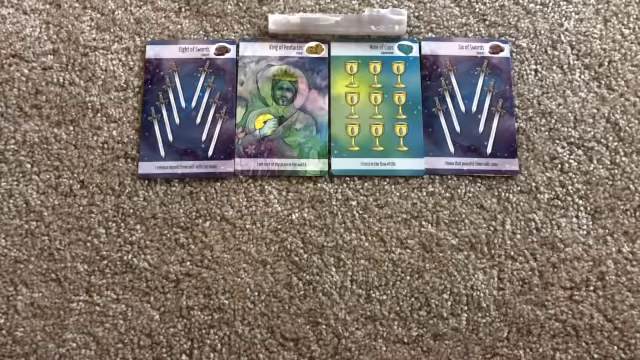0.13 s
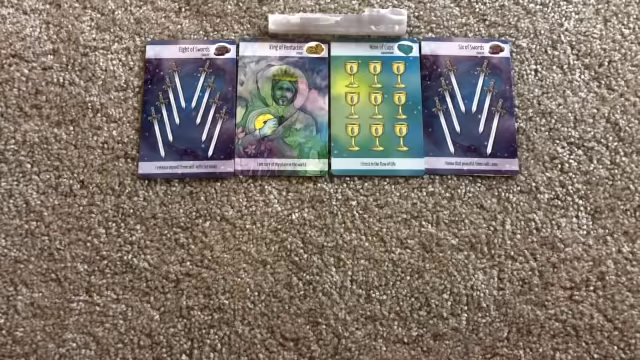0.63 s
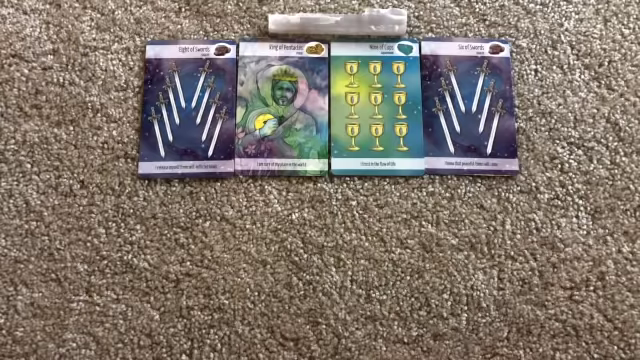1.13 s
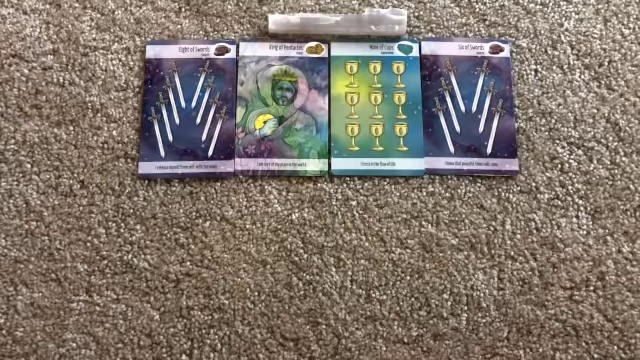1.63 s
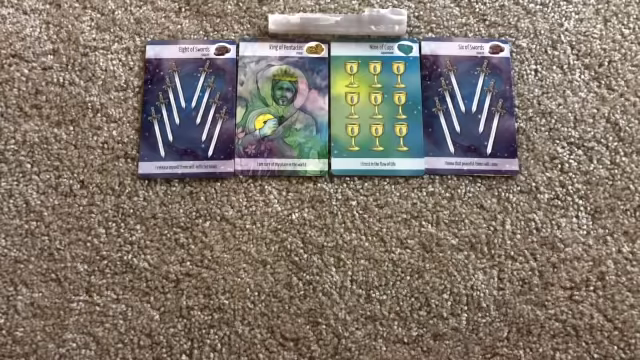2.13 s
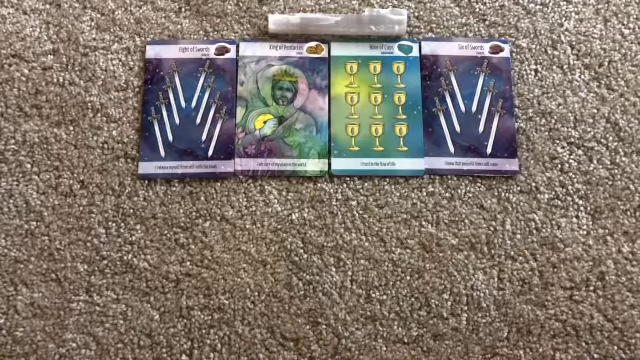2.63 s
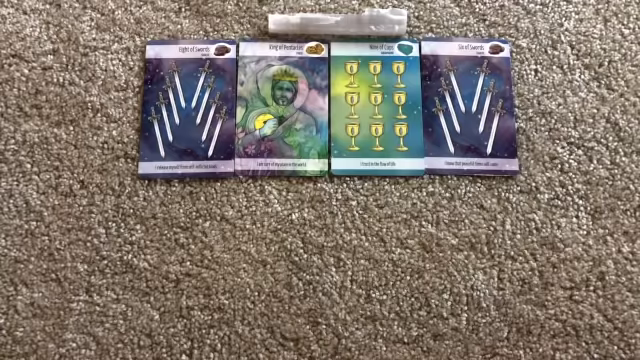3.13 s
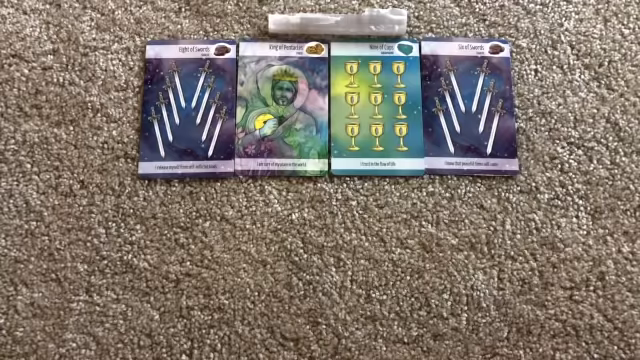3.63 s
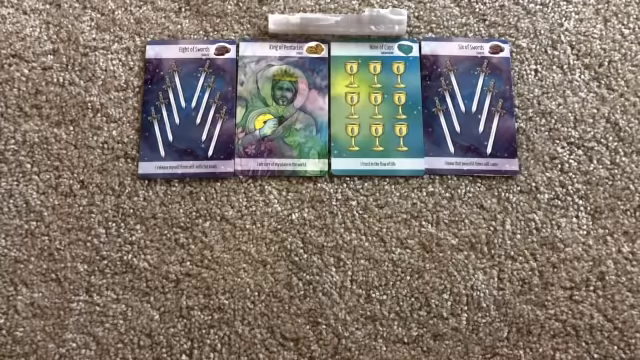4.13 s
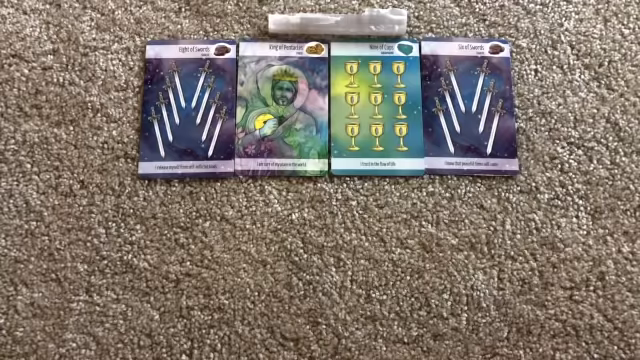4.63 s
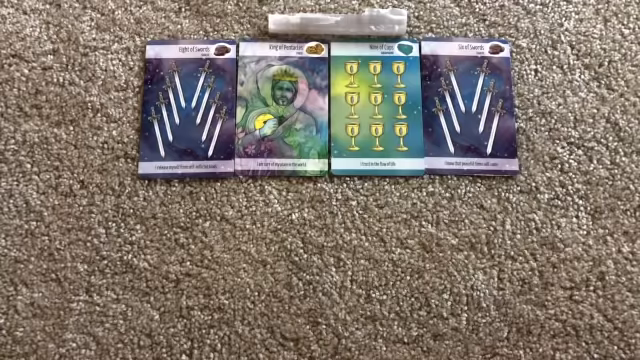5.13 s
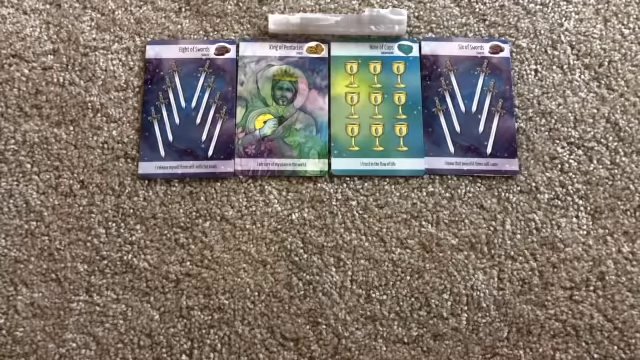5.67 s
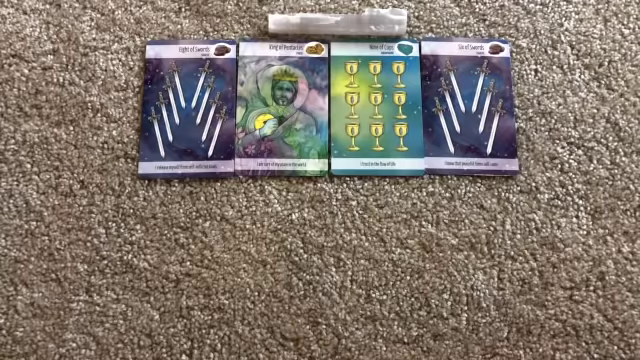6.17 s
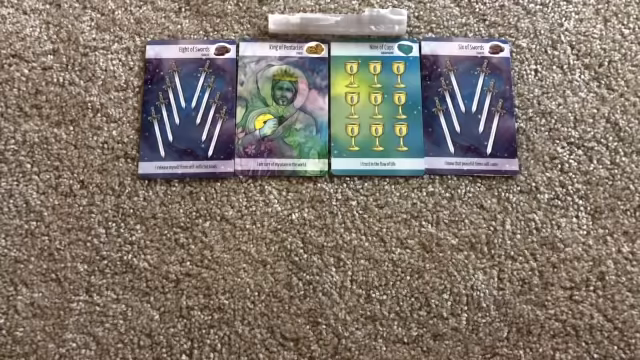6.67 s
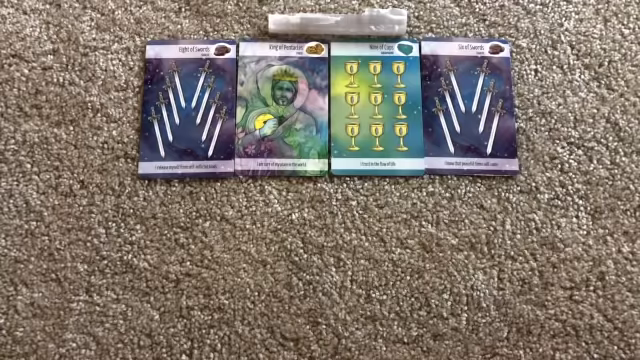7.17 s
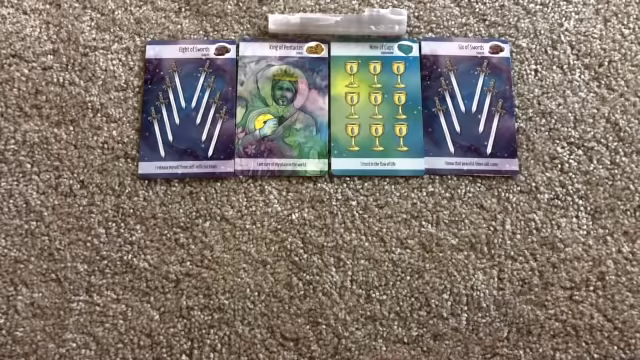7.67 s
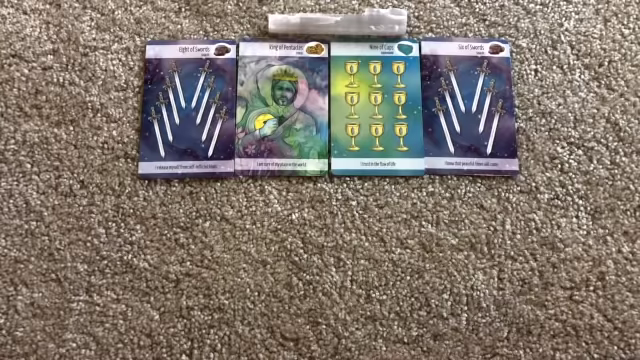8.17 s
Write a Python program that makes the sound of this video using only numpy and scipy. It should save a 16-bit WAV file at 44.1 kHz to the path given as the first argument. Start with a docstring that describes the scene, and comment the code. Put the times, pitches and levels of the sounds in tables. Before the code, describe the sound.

Stiff cards are softly fingered for six seconds in a quiet carpeted room, then flick and slap sharply in an accelerating shuffle.

```python
"""Stiff cards are handled close to a small microphone in a quiet carpeted room, over a low ventilation rumble.
First the hands shift the deck: a faint rustle of shaped noise, with a few ticks from bursts ringing card modes.
Then packets slide as clumped grains, and cards flick and slap down in a quickening run of snaps and air puffs,
loud enough to overload the input. The room answers with a short tail of sparse, decaying echoes."""
import sys
import numpy as np
from scipy import signal
from scipy.fft import rfft, irfft
from scipy.io import wavfile
from scipy.ndimage import uniform_filter1d

SR = 44100
rng = np.random.default_rng(int(sys.argv[2]) if len(sys.argv) > 2 else 0)


def output_pcm(signal):
    """Save a mono or channel-first signal as 16-bit PCM at the path in sys.argv[1].

    Samples are clipped to [-1, 1] before scaling.
    """
    pcm = np.clip(np.atleast_2d(signal).T, -1, 1) * 32767
    wavfile.write(sys.argv[1], SR, np.round(pcm).astype(np.int16))


def undo_db(level):
    """Turn decibels back into plain size, where 20 dB means ten times bigger."""
    steps = np.asarray(level, float) / 20
    return 10 ** steps


N = 365588

# Packets sliding past each other. Each row: time in seconds, pressure in dB, contact from 0 (edge) to 1 (flat face).
PACKET_SLIDES = [(6.6, -75, .55), (6.674, -42, 0.22), (6.725, -55.5, 0.69), (6.76, -46, .6),
                 (6.796, -47, .9), (6.924, -76, 0.91), (7.144, -61, 1), (7.198, -57, .57),
                 (7.32, -63.5, .57), (7.41, -61, .57), (7.43, -53, 0.5), (7.56, -46, .66),
                 (7.652, -50.5, 0.56), (7.768, -49, .27), (7.8, -50, .5), (7.842, -30.5, 0.69),
                 (7.875, -39.5, .3), (7.93, -31, .45), (7.982, -36.5, .64), (8.015, -50, .4),
                 (8.04, -63, .3), (8.061, -69, .3)]
# Bright crackle of the card edge as the microphone hears it. Each row: frequency in Hz, relative level in dB.
EDGE_COLOUR = [(5000, -6.5), (7000, 1), (9200, 2), (11500, 2.5), (13500, 3), (15300, 0), (17000, -22)]


def evened(x):
    """Scales to rms 1."""
    return x / np.sqrt(np.mean(abs(x) ** 2) + 1e-20)


def read(points, hz, column=1):
    """Reads a table along log frequency."""
    table = np.transpose(points)
    return np.interp(np.log(hz + 1), np.log(table[0] + 1), table[column])


def add(mix, s, sound):
    """Mixes a sound in at time s."""
    part = mix[round(s * SR):][:len(sound)]
    part += sound[:len(part)]


def coloured(x, gain):
    """Filters by gain(Hz) and scales to rms 1."""
    hz = np.fft.rfftfreq(len(x), 1 / SR)
    return evened(irfft(rfft(x) * gain(hz), len(x)))


def bumps(rows, hz):
    """Sums bell-shaped boosts or dips in dB, each row: centre in Hz, width in Hz, depth in dB."""
    return sum(db * np.exp(-((hz - f) / w) ** 2 * 2) for f, w, db in rows)


def room_tone():
    """Steady ventilation rumble and microphone hiss, as shaped noise; the rumble drifts a little."""
    # Spectrum of the still room. Each row: frequency in Hz, relative level in dB per Hz.
    air = [(12, -34), (20, -0.5), (82, -0.5), (319, -12), (603, -11), (693, -16.5), (940, -13), (1210, -19),
           (6360, -25), (11100, -25), (15000, -26)]
    # Ventilation drone in room resonances. Each row: frequency in Hz, width in Hz, boost in dB.
    drone = [(71, 8, 6), (91.4, 4, 5), (120, 5.2, 2.5), (149, 13, 4)]
    level_db = -58
    frames, hz = N // 2048 + 6, np.fft.rfftfreq(8192, 1 / SR)
    real, imaginary, patches = rng.standard_normal((frames, 4097, 3)).T
    patches = evened(uniform_filter1d(uniform_filter1d(patches, 6, 0), 4, 1))
    drift_db = 1.1 * patches / (1 + hz[:, None] / 800)
    colour_db = read(air, np.minimum(hz, 15000)) + bumps(drone, hz)
    spectrum = (real + 1j * imaginary) * undo_db(colour_db[:, None] + drift_db)
    tone = signal.istft(spectrum, nperseg=8192, noverlap=6144)[1][:N]
    return undo_db(level_db) * evened(tone)


def room(x):
    """Three sparse tails fed in rotation, each band dying at its own speed."""
    # Room tail. Each row: frequency in Hz, relative level in dB, time to fall by 60 dB in seconds.
    tail_bands = [(200, -6.5, .5), (601, -6.5, 0.32), (1600, -2, 0.4), (2900, -2.5, 0.51),
                  (4500, -8.5, 0.56), (6500, -4.5, 0.52), (10000, -7, 0.43), (15000, -3, 0.33)]
    slots = np.arange(180, SR * 3 // 4, 20)
    places = slots + rng.integers(0, 20, (3, len(slots)))
    signs = rng.choice([-1., 1.], (3, len(slots)))
    taps = np.zeros((3, SR))
    np.put_along_axis(taps, places, signs, 1)
    hz, t, z = signal.stft(taps, SR, nperseg=128)
    late = undo_db(-60 * t / read(tail_bands, hz, column=2)[:, None])
    early = undo_db(3 - 60 * t / 0.14)  # floor and nearby furniture answer first
    colour = undo_db(read(tail_bands, hz))[:, None]
    tails = signal.istft(z * colour * (late + early), SR, nperseg=128)[1]
    turn = 2 * np.pi * (7.0 * np.arange(N) / SR + np.arange(3)[:, None] / 3)  # 7 turns a second
    feeds = x * np.sqrt(2 / 3) * np.cos(turn)
    return signal.fftconvolve(feeds, tails / np.linalg.norm(tails[0]), axes=1)[:, :N].sum(0)


def carpet_bounce(x):
    """The bounce off the carpet cancels part of the direct sound, leaving dips in the spectrum."""
    # Each row: frequency in Hz, width in Hz, depth in dB.
    dips = [(1930, 490, -2.5), (6990, 1740, -4)]
    hz = np.fft.rfftfreq(N, 1 / SR)
    return irfft(rfft(x) * undo_db(bumps(dips, hz)), N)


def card_modes(hz):
    """Causal response of the card's damped bending modes; the board swallows what lies above them."""
    # What a card rings with. Each row: frequency in Hz, width in Hz, level in dB.
    card = [(1110, 480, 2), (2300, 500, 0.5), (2680, 354, 0.5), (3880, 260, -1.5), (4300, 670, 5),
            (4720, 1800, 3.5)]
    board_hz = 5600
    modes = 0
    for k, (f, w, db) in enumerate(card):
        modes = modes + (-1) ** k * undo_db(db) * 1j * hz * w / (f ** 2 - hz ** 2 + 1j * hz * w)
    return modes / (1 - (hz / board_hz) ** 2 + 1j * 1.43 * hz / board_hz)


def contact(db, flat):
    """Shares a pressure between the hiss of the edge and the body of the face."""
    turn = np.pi / 2 * np.clip(flat, 0, 1)
    return undo_db(db) * np.cos(turn), undo_db(db) * np.sin(turn)


def strokes(rows):
    """Each stroke swells and fades smoothly, each row: start in seconds, length in ms, gain."""
    rise = 0.56  # share of a stroke spent pressing harder
    pressure = np.zeros(N)
    for s, length_ms, gain in rows:
        u = np.arange(0, 1, 1e3 / SR / length_ms) - rise
        swell = np.cos(np.pi / 2 * u / np.where(u < 0, rise, 1 - rise))
        add(pressure, s, gain * swell)
    return pressure


def handling():
    """Pressure of fingers on edge and face, and of the palm, as separate strokes."""
    # Fingers shifting the deck. Each row: start in seconds, length in ms, pressure in dB,
    # contact from 0 (edge) to 1 (flat face).
    finger_strokes = [(0.322, 29, -61, .12), (0.391, 36, -58, .54), (0.509, 30, -55.5, 0.36),
                      (0.61, 91, -67, 0.42), (0.76, 140, -59, 0.48), (0.905, 140, -61, 1),
                      (1.077, 117, -60.5, 0.34), (1.189, 29, -62, .14), (1.223, 46, -61.5, .07),
                      (1.645, 116, -56.5, 0.4), (1.835, 41, -68, .43), (2.094, 53, -67, 0.22),
                      (2.212, 41, -59.5, .17), (2.372, 54, -60, 0.27), (2.441, 42, -62, .09),
                      (2.686, 31, -59.5, .09), (2.712, 130, -58.5, 0.04), (2.858, 71, -62.5, .1),
                      (2.922, 130, -59.5, .17), (3.023, 138, -56, .34), (3.188, 106, -60, 0.5),
                      (3.358, 92, -66, .57), (3.628, 97, -62.5, .36), (3.752, 40, -58, 0.45),
                      (3.873, 87, -59, 0.72), (4.025, 70, -65, 0.62), (4.23, 280, -57.5, 0.54),
                      (4.419, 23, -67, .09), (4.491, 86, -66, 0.47), (4.689, 28, -60, 0.29),
                      (4.726, 53, -59.5, 0.41), (4.817, 110, -63.5, .16), (4.953, 130, -62, 0.34),
                      (5.213, 26, -61, .11), (5.524, 66, -69, .54), (5.625, 43, -58.5, 0.43),
                      (5.974, 110, -67, .24), (6.091, 43, -59, .46)]
    # Palm closing round the deck. Each row: start in seconds, length in ms, pressure in dB.
    palm_strokes = [(0.391, 40, -62), (1.223, 75, -61.5), (1.645, 170, -67), (2.212, 55, -71),
                    (4.025, 92, -66), (4.23, 185, -58.5), (4.492, 57, -68), (5.524, 79, -71),
                    (5.625, 54, -65), (6.091, 43, -64)]
    s, length_ms, db, flat = np.transpose(finger_strokes)
    fingers = [strokes(zip(s, length_ms, gain)) for gain in contact(db, flat)]
    palm = strokes((s, ms, undo_db(db)) for s, ms, db in palm_strokes)
    return fingers + [palm]


def shuffling():
    """Pressure of card on card while the packets slide, and of the palms that hold them."""
    # Palms holding the packets. Each row: time in seconds, pressure in dB.
    grip = [(6.6, -72), (7.05, -77), (7.15, -58.5), (7.4, -61.5), (7.45, -55.5), (7.65, -59.5), (7.78, -51),
            (7.98, -47), (8.06, -66.5)]
    t = np.arange(N) / SR
    s, db, flat = np.transpose(PACKET_SLIDES)
    during = (t > s[0]) & (t < s[-1])
    edge, face = contact(np.interp(t, s, db), np.interp(t, s, flat))
    palm = undo_db(np.interp(t, *np.transpose(grip)))
    return during * np.array([edge, face, palm])


def patchy(x, depth_db):
    """Skin and card catch in changing places, so the colour of a rub drifts in patches."""
    z = signal.stft(x, nperseg=256)[2]
    patches = rng.standard_normal(z.shape[::-1]).T
    patches = uniform_filter1d(uniform_filter1d(patches, size=14, axis=0), size=18, axis=1)
    return evened(signal.istft(z * undo_db(depth_db * evened(patches)), nperseg=256)[1][:N])


def rubbing(pressure, grain_db, per_s, flutter_db):
    """Dense tiny catches of face on face, in clumps, through edge and card; the palm adds low noise."""
    # Palm on the deck. Each row: frequency in Hz, relative level in dB.
    palm_colour = [(60, -26), (250, 6), (600, 2), (1200, -15.5), (2500, -24.5)]
    chance, noise = rng.random((N, 2)).T, rng.standard_normal((N, 3)).T
    sizes = undo_db(-grain_db * np.log(chance[1] + .04))
    catches = (chance[0] < per_s / SR) * sizes * noise[0]
    flutter = evened(uniform_filter1d(uniform_filter1d(noise[1], 150), 150))
    clumps = undo_db(flutter_db * flutter)
    drag = catches * clumps
    hiss = patchy(coloured(drag, lambda hz: undo_db(read(EDGE_COLOUR, hz))), depth_db=2.5)
    body = patchy(coloured(drag, lambda hz: card_modes(hz) * hz / (hz + 1500)), depth_db=3)
    low = coloured(noise[2] * clumps, lambda hz: undo_db(read(palm_colour, hz)))
    return pressure[0] * hiss + pressure[1] * body + pressure[2] * low


def puffs():
    """Air squeezed out as a card lands flat: a pressure push, a pull, and a small rebound."""
    # Each row: time of the turn from push to pull in seconds, peak level in dB, frequency in Hz.
    air_puffs = [(0.412, -38.5, 810), (0.417, -37.5, 890), (2.2632, -41, 287), (5.5592, -44, 960),
                 (6.1025, -39, 940), (6.1057, -41, 1400), (6.1148, -40, 850), (6.6363, -29.5, 1350),
                 (6.6512, -17.5, 970), (6.659, -27, 734), (6.7412, -6.5, 1140), (6.745, -12.5, 1240),
                 (6.751, -28, 900), (6.793, -18.5, 1190), (6.811, -37, 256), (6.9372, -35.5, 466),
                 (6.951, -35.5, 269), (7.094, -35.5, 900), (7.1153, -39.5, 360), (7.142, -36.5, 796),
                 (7.157, -39, 480), (7.168, -40, 815), (7.1782, -35, 800), (7.19, -29, 360),
                 (7.1997, -34, 690), (7.2693, -38, 630), (7.3026, -33.5, 850), (7.3206, -20.5, 1070),
                 (7.3473, -19.5, 993), (7.347, -27.5, 350), (7.4383, -41, 802), (7.446, -12, 1350),
                 (7.4546, -29.5, 620), (7.4918, -43, 330), (7.5266, -29, 1013), (7.543, -23, 616),
                 (7.5719, -23.5, 590), (7.6655, -19.5, 760), (7.6881, -19, 1410), (7.711, -28.5, 796),
                 (7.7135, -21.5, 800), (7.7382, -14, 851), (7.7864, -27, 779), (7.7902, -25.5, 980),
                 (7.814, -26, 1396), (7.8249, -15, 908), (7.8341, -24.5, 748), (7.845, -13, 990),
                 (7.857, -18.5, 1280), (7.8667, -22.5, 910), (7.87, -18.5, 795), (7.8974, -10, 1010),
                 (7.9007, -14, 1310), (7.9155, -13.5, 1360), (7.9392, -23.5, 836), (7.9446, -17, 800),
                 (7.965, -16.5, 826), (7.9907, -37.5, 890), (8.012, -25.5, 740)]
    out = np.zeros(N)
    for s, db, hz in air_puffs:
        cycles = np.arange(0, 3.3 / hz, 1 / SR) * hz
        shape = np.sin(2 * np.pi * cycles) * np.exp(-(cycles / 0.95) ** 2) * np.minimum(cycles / 0.39, 1)
        backflow = np.hanning(len(shape))
        shape -= 0.52 * shape.sum() * backflow / backflow.sum()  # about half of the net air flows back
        add(out, s - .5 / hz, undo_db(db) * shape / abs(shape).max())
    return out


def strays(count):
    """Small catches of card edges fall at random where the packets slide, as extra rows of snaps."""
    s, db = np.transpose(PACKET_SLIDES)[:2]
    when, size, tone, hz, length = rng.random((count, 5)).T
    at = s[0] + when * (s[-1] - s[0])
    body_db = np.interp(at, s, db) + 2 - 8 * size  # from 6 dB under the sliding pressure to 2 dB over it
    treble_db = body_db + 12 * (tone - .5)
    centre_hz, length_ms = 3564 + 3060 * hz, 1 + 2 * length
    return list(zip(at, body_db, treble_db, centre_hz, length_ms))


def snaps():
    """Each snap is a crack inside a quick burst of micro-slips; returns the near sound and the room's feed."""
    # Card edges snapping past a thumb or onto the pile. Each row: time of the crack in seconds,
    # body level in dB, treble level in dB, body centre in Hz, length in ms.
    card_snaps = [(0.409, -39.5, -39.5, 3080, 2.4), (0.415, -44.5, -51, 3300, 1.4),
                  (0.5273, -60, -59, 4000, 5.6), (0.8852, -69, -41, 3950, 1.6),
                  (0.921, -65, -47, 3600, 4.6), (0.9313, -51, -54, 4000, 4), (0.9382, -49, -51, 4130, 8.9),
                  (0.9478, -26, -31.5, 4300, 2.1), (1.6897, -48, -45.5, 2300, 4.5),
                  (1.7408, -54, -46.5, 4000, 4.3), (1.7639, -67, -52, 3300, 2.1),
                  (1.7795, -70, -49, 2900, 1.6), (2.2254, -58, -50, 3300, 6.1),
                  (2.2615, -48.5, -58, 2460, 1.4), (2.4666, -59, -55, 2700, 6), (2.698, -72, -58, 3300, 6),
                  (2.9944, -52, -49, 4300, 2), (3.7037, -62, -40.5, 4200, 3.1),
                  (4.3732, -47, -54, 4300, 1.1), (4.7813, -47, -62, 3580, 1.8),
                  (5.0443, -53, -50, 3500, .8), (5.4575, -48.5, -38.5, 3900, 1.6),
                  (5.5578, -45.5, -37, 2800, 0.75), (6.1025, -42, -60, 1690, 1.7),
                  (6.1157, -41, -47.5, 2150, 2.6), (6.623, -41, -36.5, 4100, 2.2),
                  (6.6347, -28.5, -59, 2700, 1.5), (6.6409, -48, -27, 4500, 1.8),
                  (6.6505, -20.5, -19.5, 2800, 4.5), (6.6533, -25.5, -30.5, 2480, 3),
                  (6.6744, -41, -47, 4200, 5.7), (6.732, -50, -44, 4500, 1.8),
                  (6.7409, -4, -9.5, 3400, 2.4), (6.7458, -10, -4.5, 4000, 1.12),
                  (6.7523, -26, -23.5, 3400, 1.4), (6.7898, -10, -17.5, 2500, 2.65),
                  (6.798, -45, -31.5, 3800, 3.8), (6.809, -33, -38, 2300, 4.8),
                  (6.936, -37, -39, 4100, 1.4), (6.9525, -57.5, -40, 4400, 8.4),
                  (7.095, -45, -32.5, 3600, 2.1), (7.1154, -52, -52, 4000, 3),
                  (7.1407, -48, -35, 2700, 1.3), (7.158, -25.5, -27, 2900, 1.76),
                  (7.166, -45, -38, 2800, 8.7), (7.1715, -30, -28.5, 3500, 1.8),
                  (7.179, -40, -37, 3800, 1.01), (7.1852, -25, -25.5, 4500, 0.91),
                  (7.1893, -29.5, -36, 2700, 1.8), (7.2001, -34.5, -27, 3900, 1.1),
                  (7.2686, -37, -43, 3870, 1.4), (7.3021, -25.5, -27.5, 4860, 1.2),
                  (7.321, -28.5, -40, 1690, 2.3), (7.3285, -29, -24, 4400, 1.4),
                  (7.3456, -15.5, -19.5, 4100, 1.6), (7.4343, -51, -37.5, 3000, 5.2),
                  (7.438, -33, -49, 3800, 1.1), (7.4454, -4, -7, 3460, 0.84), (7.4502, -31, -25, 3005, 5),
                  (7.4594, -40, -28, 3600, 4.3), (7.4893, -35, -31, 3980, 2.1),
                  (7.5246, -29, -35, 3370, 1.5), (7.54, -32, -26.5, 3600, 3.7),
                  (7.5426, -35, -39.5, 2200, 1.9), (7.554, -32, -32.5, 3600, 1.6),
                  (7.5681, -14, -14, 4300, 1.65), (7.599, -50.5, -34.5, 3500, 1.8),
                  (7.6428, -32, -50.5, 4500, 2.2), (7.6468, -33, -29.5, 3820, 1.9),
                  (7.6612, -30.5, -28, 4100, 3.6), (7.6654, -32.5, -41, 1600, 2),
                  (7.6867, 0.5, -11, 4590, 0.54), (7.6997, -36, -39, 3300, 2.8),
                  (7.7047, -47.5, -33.5, 4450, 5.8), (7.7185, -26.5, -28, 4620, 2.1),
                  (7.7338, -23.5, -25, 3210, 2.9), (7.768, -29.5, -31, 4800, 2.4),
                  (7.7857, -28, -50, 1786, 1.2), (7.803, -40.5, -34.5, 4150, 5),
                  (7.8151, -8.5, -10, 3050, 1.7), (7.826, -6, -9.5, 3720, 3),
                  (7.844, -28.5, -32, 2000, 2.2), (7.8518, -37, -37.5, 3556, 2.1),
                  (7.8571, -1, -7, 3400, 2.3), (7.865, -30, -32.5, 3000, 3), (7.8696, -29, -30, 2900, 1.2),
                  (7.8838, -36, -41.5, 3700, 5.5), (7.8986, 1.5, -10, 2990, 2.5),
                  (7.9031, 0.5, -3, 3280, 1.83), (7.9165, -5.5, -14.5, 2805, 3.5),
                  (7.9365, -22, -22.5, 3400, 4.5), (7.9442, -22, -30, 2900, 4.9),
                  (7.9501, -33, -34, 4100, 1.2), (7.9565, -26, -35.5, 2790, 3.2),
                  (7.9655, -14.5, -23.5, 2720, 1.7), (7.9782, -27, -39.5, 2900, 1.8),
                  (7.9895, -21.5, -34.5, 3360, 1.6), (8.0092, -22, -23.5, 4300, 1.3),
                  (8.1765, -51, -51, 4000, 2.1)]
    rise = .36  # share of a snap spent bending before the edge lets go
    size, lead = 2048, 256  # samples in a snap, and of those ahead of the crack
    near, spread = np.zeros((2, N))
    t, hz = (np.arange(size) - lead) / SR, np.fft.rfftfreq(size, 1 / SR)
    rows = card_snaps + strays(count=14)
    slips = rng.standard_normal((len(rows), 2, size))
    slips[:, :, lead] += 5.1 * np.sign(slips[:, :, lead])  # the edge lets go all at once
    bends = rng.uniform(-1.51, 1, len(rows))
    crack = rfft(t == 0)
    for (s, body_db, treble_db, centre_hz, length_ms), slip, bend in zip(rows, slips, bends):
        rise_ms, fall_ms = rise * length_ms, (1 - rise) * length_ms
        burst = np.where(t < 0, np.exp(-(1e3 * t / rise_ms) ** 2), np.exp(-1e3 * abs(t) / fall_ms))
        # grip favours modes near the centre
        free = 1 / (1 + 1j * 2.33 * (hz / centre_hz - centre_hz / (hz + 1)))
        body = card_modes(hz * (1 + 0.13 * bend)) * free  # curve of the card shifts its modes
        tilt_db = 1.5 * np.log2(2.4 / length_ms) * np.log2((hz + 1) / 11000)  # quick snaps are brighter
        edge = undo_db(read(EDGE_COLOUR, hz) + tilt_db)
        energy = np.sqrt(length_ms * 0.00077 * SR / 2)  # the level holds over the length of the snap
        for db, colour, shake in zip((body_db, treble_db), (body, edge), slip):
            # summed over all directions the slips even out, so the room hears the plain colour of the card
            for mix, drive in ((near, rfft(shake * burst)), (spread, crack)):
                sound = irfft(drive * colour)
                add(mix, s - lead / SR, energy * undo_db(db) * sound / np.linalg.norm(sound))
    return near, spread


def scene():
    """Cards and their room tail over the room tone."""
    snapped, spread = snaps()
    soft = puffs()
    soft += rubbing(handling(), grain_db=-2, per_s=6900, flutter_db=1.5)
    soft += rubbing(shuffling(), grain_db=2.5, per_s=5000, flutter_db=4.5)
    cards = snapped + soft + undo_db(-17.5) * room(spread + soft)
    return (carpet_bounce(cards) + room_tone())[None]


def top_cut(x):
    """Nothing passes above the cut-off."""
    return signal.sosfilt(signal.butter(12, 15870, fs=SR, output="sos"), x)


def record(dry):
    """The loudest slaps hit the ceiling of the input; then the top of the band is cut."""
    clipped = np.clip(dry, -1, 1)
    low_pass = signal.firwin(301, 17000, window=("kaiser", 5), fs=SR)
    finished = signal.oaconvolve(clipped, low_pass[None], "same")
    return top_cut(finished)


dry = scene()
out = record(dry)
output_pcm(out)
```